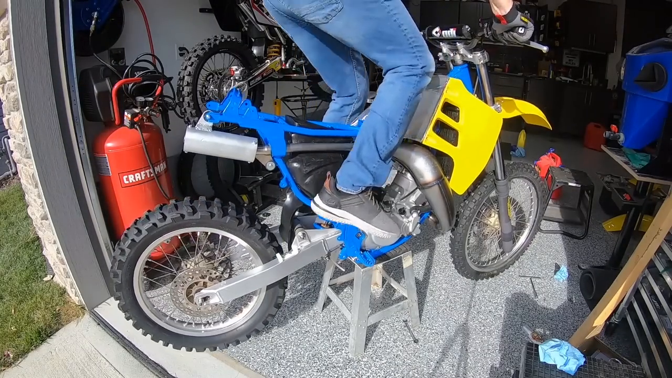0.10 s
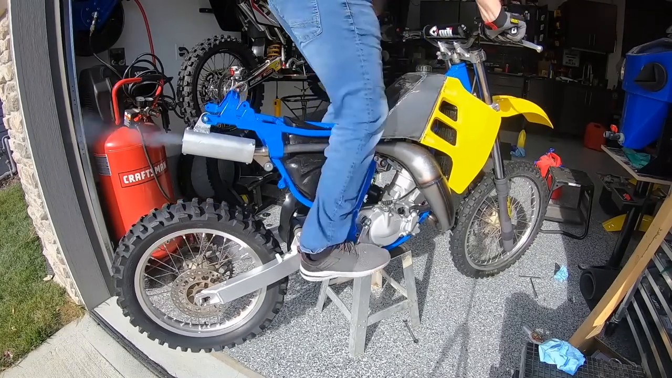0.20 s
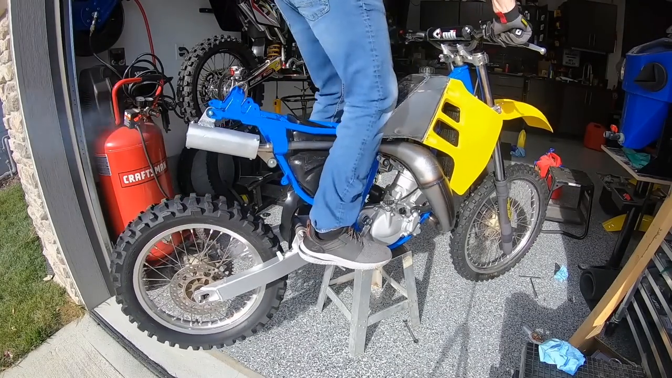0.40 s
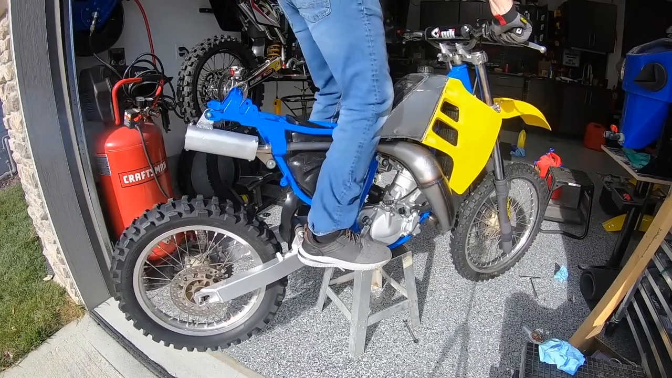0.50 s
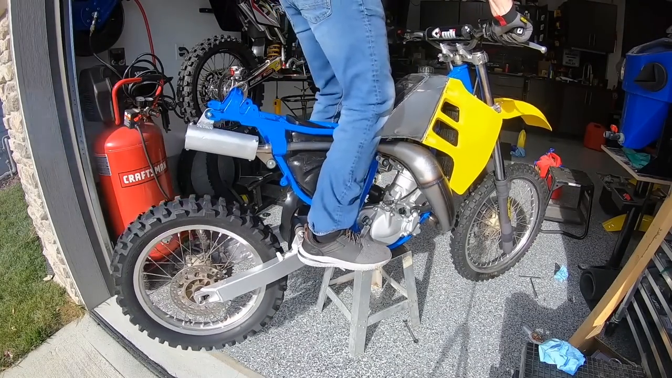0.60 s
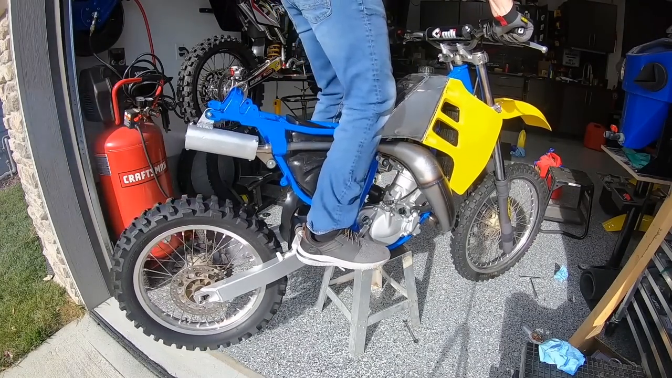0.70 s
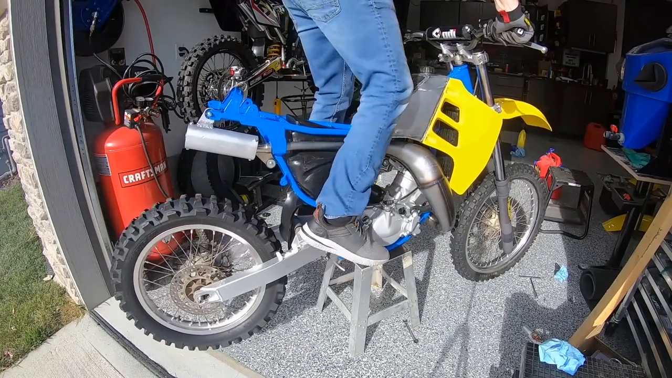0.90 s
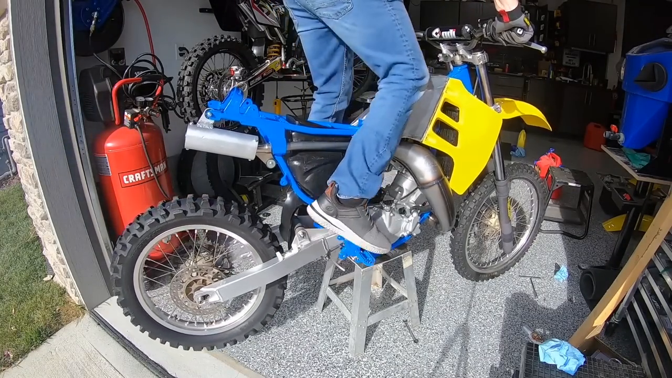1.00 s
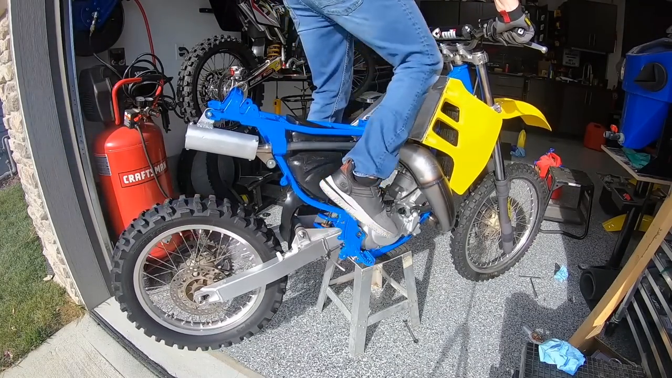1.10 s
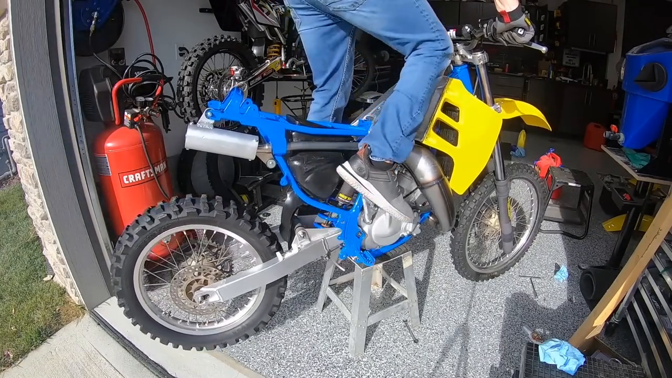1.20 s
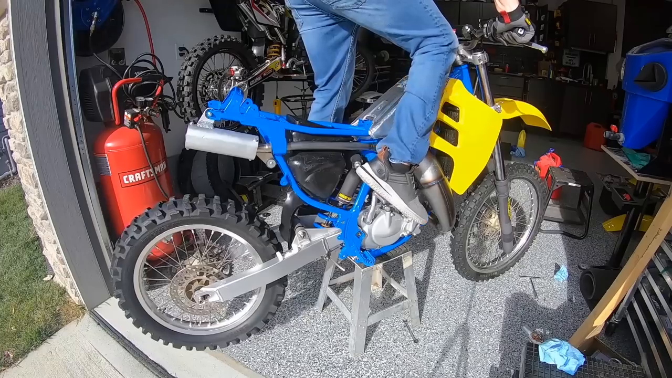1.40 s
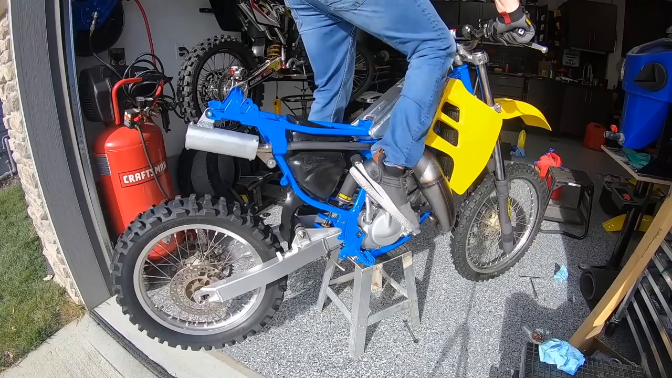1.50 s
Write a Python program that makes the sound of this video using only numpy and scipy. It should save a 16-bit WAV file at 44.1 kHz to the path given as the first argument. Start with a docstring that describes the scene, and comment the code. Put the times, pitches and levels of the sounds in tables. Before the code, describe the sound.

A dirt bike kick-starter is stomped once: ratchety whirr and hollow puffs, engine does not catch.

```python
"""Dirt bike that will not start

A two-stroke dirt bike is kicked over in an open garage and does not catch. Gears whirr as dense random hits,
gas rasps as filtered noise, the exhaust pipe puffs with short sine tones, and ratchet ticks are noise bursts.
Then the kick lever swings back up: noise clacks and ringing steel. Light wind, as noise, touches the microphone."""
import sys
import numpy as np
from scipy import signal
from scipy.fft import rfft, irfft, next_fast_len
from scipy.io import wavfile
from scipy.ndimage import map_coordinates

SR = 44100
rng = np.random.default_rng(int(sys.argv[2]) if len(sys.argv) > 2 else 0)


def transcribe(signal):
    """Save signal, clipped to [-1, 1], as a 16-bit WAV file at the path in sys.argv[1]."""
    frames = np.atleast_2d(signal).T
    limited = np.clip(frames, -1, 1)
    pcm = np.round(limited * 32767).astype(np.int16)
    wavfile.write(sys.argv[1], SR, pcm)


N = 66150  # samples: 1.5 s


def amp(db):
    """Turn decibels into gain."""
    return 10 ** (np.asarray(db) / 20)


def unit(x):
    """Scale a sound to an average (rms) strength of 1."""
    return x / np.sqrt(np.mean(x ** 2) + 1e-20)


def along(points, hz):
    """Read a table of (frequency, value) points, joined up on a logarithmic frequency axis."""
    point_hz, values = np.transpose(points)
    return np.interp(np.log(hz + 1), np.log(point_hz + 1), values)


def level(points):
    """Gain for every sample from (time [s], level [dB]) points."""
    return amp(np.interp(np.arange(N) / SR, *np.transpose(points)))


def since(start_s):
    """Seconds since a start time, zero before it."""
    return np.maximum(np.arange(N) / SR - start_s, 0)


def burst(start_s, attack_s, hold_s, t60_s):
    """Loudness curve: quick rise, short hold, then a fall of 60 dB every t60_s."""
    t = since(start_s)
    rise = 1 - np.exp(-t / attack_s)
    fall = amp(-60 * np.maximum(t - hold_s, 0) / t60_s)  # the hold is counted from the start
    return rise * fall


def filtered(x, response):
    """Reshape the spectrum of x with a function of frequency."""
    size = next_fast_len(N + SR // 2)
    spectrum = rfft(x, size) * response(np.fft.rfftfreq(size, 1 / SR))
    return irfft(spectrum, size)[..., :N]


def resonant(x, resonances):
    """Add resonances, each lifting a narrow band, to x; rows are (Hz, width Hz, lift dB)."""
    def response(f):
        return 1 + sum((amp(lift_db) - 1) * 1j * f * width / (hz * hz - f * f + 1j * f * width)
                       for hz, width, lift_db in resonances)
    return filtered(x, response)


# How wide the stereo sound is: (frequency [Hz], side level over middle level [dB])
STEREO_WIDTH = [(25, -10), (60, -16), (150, -21), (280, -21.5), (500, -12.5), (1000, -4.5), (2000, -5),
                (4000, -7), (7500, -0.5), (12000, 1)]


def spread(pair):
    """Mix two unrelated signals into left and right: nearly mono in the bass, wide in the treble."""
    def middle_and_side(hz):
        angle = np.arctan(amp(along(STEREO_WIDTH, hz)))
        return np.array([np.cos(angle), np.sin(angle)])
    mid, side = filtered(pair, middle_and_side)
    return np.array([mid + side, mid - side])


def noise(colour):
    """Stereo noise of rms 1, coloured by (frequency [Hz], level [dB]) points."""
    coloured = filtered(rng.standard_normal((2, N)), lambda hz: amp(along(colour, hz)))
    return unit(spread(coloured))


def ring(start_s, modes):
    """Struck steel: fading sines, a little out of phase between the two microphones."""
    t = since(start_s)
    out = np.zeros((2, N))
    for hz, db, t60_s in modes:
        strength = amp(db + rng.normal(0, 0.86))  # each strike varies a little
        turns = hz * t + rng.random() + rng.normal(0, 0.041, (2, 1))
        out += strength * burst(start_s, 0.0023, 0, t60_s) * np.sin(2 * np.pi * turns)
    return out


# How long the garage echo lasts: (frequency [Hz], time to fall by 60 dB [s])
GARAGE_DECAY = [(100, 0.57), (260, 0.55), (1000, 0.42), (4000, 0.25), (10000, 0.28)]


def garage(x):
    """The garage's echo: a fading noise tail in which each frequency dies at its own speed."""
    hz, t, cells = signal.stft(rng.standard_normal((2, SR // 2)), SR, nperseg=256)
    fade = amp(-60 * t / along(GARAGE_DECAY, hz)[:, None])
    tail = signal.istft(cells * fade, SR, nperseg=256)[1]
    tail = tail / np.linalg.norm(tail[0])
    tail = np.pad(tail, ((0, 0), (SR // 125, 0)))  # the echo starts 8 ms late
    return spread(signal.fftconvolve(np.atleast_2d(x), tail, axes=1)[:, :N])


# Rise and fall of the wind: (time [s], level [dB])
WIND_LEVEL = [(0, -34.5), (.15, -37.5), (.24, -35), (.45, -39), (.65, -37), (.87, -35.5), (1.0, -40),
              (1.15, -37), (1.5, -34)]
# Spectrum of the wind noise, before it is scaled to rms 1: (frequency [Hz], level [dB])
WIND_COLOUR = [(12, 1), (26, 9), (38, -7), (54, -0.5), (75, -13.5), (110, -13.5), (180, -22), (400, -26),
               (2000, -97)]
# Spectrum of the quiet air, before it is scaled to rms 1: (frequency [Hz], level [dB])
AIR_COLOUR = [(60, -38), (170, -8), (260, 11), (420, -10), (560, -2.5), (1000, -14.5), (2500, -12.5),
              (5000, -23.5), (9000, -28), (11000, -45), (15000, -33)]
AIR_DB = -49


def background():
    """Wind on the microphone, a low noise that swells and sinks, over quiet steady outdoor air."""
    wind = level(WIND_LEVEL) * noise(WIND_COLOUR)
    air = amp(AIR_DB) * noise(AIR_COLOUR)
    return wind + air


# Loudness of the whirring gears: (time [s], level [dB])
WHIRR_LEVEL = [(0, -44), (.10, -48.5), (.15, -41), (.20, -31), (.26, -33.5), (.33, -27), (.40, -27),
               (.49, -28.5), (.60, -30), (.68, -33), (.75, -40.5), (.83, -42.5), (.93, -51), (1.02, -55),
               (1.5, -62)]
# Spectrum of the tooth clatter, before it is scaled to rms 1: (frequency [Hz], level [dB])
WHIRR_COLOUR = [(40, -6.5), (130, 3), (260, 7), (440, 0.5), (540, -5.5), (700, -1.5), (1100, -8),
                (2000, -7), (3600, -7), (4600, -12), (7500, -12.5), (9600, -17.5), (11500, -28.5),
                (14500, -36), (16000, -60)]
# Ringing tones of the crankcase: (frequency [Hz], level against each other [dB])
CASE_MODES = [(524, 3), (1003, 1.5), (1057, 1.5), (1335, 0.5), (1531, -9), (1900, -3), (3047, -4),
              (3704, -18), (4070, -5.5)]
CASE_T60_S, CASE_DB = 0.058, -6  # case level is against the clatter
TEETH_PER_S, TEETH_SPREAD_DB = 3500, 1  # average number of hits, random variation of their level
GRIND_PER_S, GRIND_DB = 200, 1  # how fast and how deep the clatter clumps


def gears():
    """Dense tooth contacts clatter in clumps and ring the crankcase."""
    slow_steps = np.arange(N) * GRIND_PER_S / SR
    clumps = amp(GRIND_DB * map_coordinates(rng.standard_normal(N), [slow_steps]))
    contacts = rng.random(N) < TEETH_PER_S / SR
    strength = amp(TEETH_SPREAD_DB * rng.standard_normal(N))
    hits = clumps * contacts * strength * rng.standard_normal((2, N))
    clatter = unit(spread(filtered(hits, lambda hz: amp(along(WHIRR_COLOUR, hz)))))
    case_ring = ring(0, [(hz, db, CASE_T60_S) for hz, db in CASE_MODES])
    case = signal.fftconvolve(hits, case_ring, axes=1)[:, :N]
    return level(WHIRR_LEVEL) * (clatter + amp(CASE_DB) * unit(spread(case)))


# Spectra of the lower and upper part of a tick, before scaling to rms 1: (frequency [Hz], level [dB])
TICK_BODY = [(300, -29), (1200, -17), (2300, 5), (3600, -0.5), (4400, -6.5), (7000, -17), (12000, -29)]
TICK_TREBLE = [(1000, -33), (4000, -16), (5200, -1), (5900, 0), (7000, 6.5), (7800, 3), (8600, 4),
               (9700, -3.5), (11200, -37), (14500, -35)]
# Resonances of the ratchet: (frequency [Hz], width [Hz], lift [dB])
RATCHET_RESONANCES = [(2310, 180, -1), (3020, 110, 4), (3690, 180, 5), (4960, 150, 4.5), (7000, 260, 1.5),
                      (8650, 89, -7.5)]


def ratchet(contacts, attack_s, hold_s, t60_s):
    """The starter ratchet's teeth slide or skip over each other and excite its resonances."""
    shapes = np.array([burst(start_s, attack_s, hold_s, t60_s) for start_s, _, _ in contacts])
    body, treble = amp(np.array(contacts)[:, 1:]).T @ shapes
    friction = body * noise(TICK_BODY) + treble * noise(TICK_TREBLE)
    return amp(-2) * resonant(friction, RATCHET_RESONANCES)


# Soft scrapes, levels before the ratchet's 2 dB cut and resonances:
# (time [s], body level [dB], treble level [dB])
SCRAPES = [(0, -44.5, -37.5), (.045, -42.5, -43.5), (.113, -40.5, -42), (.170, -42, -64)]


def scrapes():
    """The boot loads the lever and the ratchet teeth scrape softly, with a slow fade."""
    return ratchet(SCRAPES, attack_s=0.00097, hold_s=0.0072, t60_s=0.22)


# Gusts of gas, levels before the resonances:
# (time [s], level [dB], hold [s], resonance [Hz])
GUSTS = [(0.203, -20, 0.0055, 526), (0.219, -25.5, 0.029, 760), (0.28, -17, 0.0055, 640),
         (0.354, -20, 0.018, 1955), (0.441, -30, 0.0042, 2540), (0.449, -19.5, 0.014, 1536),
         (0.599, -29, 0.0052, 1360), (0.766, -34, 0.02, 1040)]
# Spectrum of the gas noise, before it is scaled to rms 1: (frequency [Hz], level [dB])
GAS_COLOUR = [(60, 2), (150, 7), (330, 8.5), (450, -5), (530, 2), (900, -3), (1600, -1.5), (1950, -3),
              (2150, -12.5), (3700, -10), (5000, -29), (9500, -22.5), (11500, -34), (15000, -43)]
# Resonance of the expansion chamber: (frequency [Hz], width [Hz], lift [dB])
CHAMBER = [(519.8, 12, 13.5)]
GUST_ATTACK_S, GUST_T60_S = 0.0025, 0.071
GUST_WIDTH_HZ, GUST_LIFT_DB = 52, 8.5


def ports():
    """Compressed gas rasps out of the cylinder, each gust with its own throat, and rings the chamber."""
    gas = noise(GAS_COLOUR)
    gusts = np.zeros((2, N))
    for start_s, db, hold_s, hz in GUSTS:
        gust = amp(db) * burst(start_s, GUST_ATTACK_S, hold_s, GUST_T60_S) * gas
        gusts += resonant(gust, [(hz, GUST_WIDTH_HZ, GUST_LIFT_DB)])
    return resonant(gusts, CHAMBER)


# Puffs in the exhaust pipe, levels before the pipe tones' own:
# (time [s], level [dB], hold [s], pitch [Hz])
PUFFS = [(0.205, -7.5, 0.021, 242.6), (0.238, -7, 0.0046, 262), (0.248, -2.5, 0.011, 251.7),
         (0.265, -11, 0.0078, 223), (0.287, -2, 0.0097, 227), (0.307, -15, 0.0074, 222),
         (0.324, -3, 0.008, 252.5), (0.348, -18, 0.01, 209), (0.361, -4, 0.0079, 245),
         (.382, -13, 0.017, 269), (0.429, -18, 0.0079, 257), (0.452, -11, 0.006, 227),
         (.620, -23, 0.012, 216), (.674, -18, 0.017, 253), (0.775, -15, 0.014, 237),
         (0.802, -25, 0.0092, 268), (0.834, -37, 0.0072, 265)]
# Tones of the pipe: (multiple of the pitch, level [dB])
PIPE_TONES = [(1, -1.5), (1.52, -15), (.66, -18.5)]
PUFF_ATTACK_S, PUFF_T60_S, PUFF_ECHO_DB = 0.0022, 0.026, -12.5


def exhaust():
    """The piston pumps hollow puffs, each booming for a few cycles in the pipe."""
    out = np.zeros((2, N))
    for start_s, db, hold_s, hz in PUFFS:
        tone = np.zeros(N)
        for i, (multiple, tone_db) in enumerate(PIPE_TONES):
            phase = (i > 0) * rng.random()  # the main tone always starts at zero
            tone += amp(tone_db) * np.sin(2 * np.pi * (multiple * hz * since(start_s) + phase))
        puff = amp(db) * burst(start_s, PUFF_ATTACK_S, hold_s, PUFF_T60_S) * tone
        out += puff + amp(PUFF_ECHO_DB) * garage(puff)
    return out


# Ratchet ticks, levels before the ratchet's 2 dB cut and resonances:
# (time [s], body level [dB], treble level [dB])
TICKS = [(.222, -27, -56), (.243, -25, -41), (0.28, -22.5, -27), (.320, -54, -31.5), (.354, -23, -33),
         (0.379, -37, -31.5), (.395, -29, -31), (.409, -29.5, -36), (0.426, -36, -33), (.444, -23, -38),
         (.458, -58, -27.5), (.476, -41, -32), (.506, -30, -30.5), (.526, -28, -37), (.543, -27.5, -32.5),
         (.565, -27.5, -39), (0.585, -34, -29.5), (0.609, -25.5, -32), (.633, -30.5, -30.5),
         (0.663, -37.5, -30.5), (0.694, -26, -32), (.735, -39, -34.5), (.752, -37, -37), (.771, -35, -44),
         (0.79, -45, -37.5), (.811, -46, -46), (.837, -43.5, -40), (.860, -42, -38.5), (.887, -42, -40.5),
         (.923, -43, -38.5), (.959, -42, -39)]


def ticks():
    """The starter ratchet rattles, its sharp ticks slowing towards the end."""
    return ratchet(TICKS, attack_s=0.00059, hold_s=0.0042, t60_s=0.054)


# Short tinks: (time [s], pitch [Hz], level [dB])
TINKS = [(0.228, 10520, -36.5), (.890, 2920, -41.5), (1.015, 2270, -44)]
TINK_WIDTH_HZ, TINK_ATTACK_S, TINK_HOLD_S, TINK_T60_S = 430, 0.0011, 0.0089, 0.039


def tinks():
    """Loose steel parts buzz briefly, each in one narrow resonance."""
    out = np.zeros((2, N))
    for start_s, hz, db in TINKS:
        hiss = rng.standard_normal((2, N))
        buzz = filtered(hiss, lambda f: 1 / (1 + (2 * (f - hz) / TINK_WIDTH_HZ) ** 2))
        shape = burst(start_s, TINK_ATTACK_S, TINK_HOLD_S, TINK_T60_S)
        out += amp(db) * shape * unit(spread(buzz))
    return out


# Clacks of the returning lever, noise levels before the resonances, ring level added to each tone's own:
# (time [s], level [dB], treble level [dB], ring level [dB], lower resonance [Hz], upper resonance [Hz])
CLACKS = [(1.058, -32.5, -40, -41, 3240, 4100), (1.145, -33.5, -37.5, -31.5, 2220, 4770),
          (1.231, -31.5, -39, -33, 1840, 4400), (1.327, -31.5, -36, -46, 1900, 7800)]
# Spectra of the clacks and of the last click, before scaling to rms 1: (frequency [Hz], level [dB])
CLACK_COLOUR = [(200, 0), (500, -8.5), (800, 3.5), (1300, -0.5), (2100, -2), (2900, 1.5), (4000, -0.5),
                (5500, -3.5), (8000, -8.5), (9700, -4), (11500, -32), (15000, -27)]
STOP_COLOUR = [(500, -32), (1700, -14), (2400, 0), (3050, -4), (3400, -6), (5200, -16), (5900, -1),
               (6600, 0), (8200, -5.5), (9600, -23), (15000, -44)]
CLACK_ATTACK_S, CLACK_HOLD_S, CLACK_T60_S = 0.0014, 0.0044, 0.068
CONTACT_WIDTHS_HZ, CONTACT_LIFT_DB = (240, 170), 6.5  # widths of the lower and upper resonance
STOP_S, STOP_DB, STOP_T60_S = 1.457, -36.5, 0.03  # the last, lighter click


def lever():
    """The lever rises over the teeth, each clack with its own colour, and comes to its stop."""
    body, treble = noise(CLACK_COLOUR), noise(TICK_TREBLE)
    stop_shape = burst(STOP_S, CLACK_ATTACK_S, CLACK_HOLD_S, STOP_T60_S)
    out = amp(STOP_DB) * stop_shape * noise(STOP_COLOUR)
    for start_s, db, treble_db, _, *contact_hz in CLACKS:
        shape = burst(start_s, CLACK_ATTACK_S, CLACK_HOLD_S, CLACK_T60_S)
        crack = shape * (amp(db) * body + amp(treble_db) * treble)
        resonances = [(hz, width, CONTACT_LIFT_DB) for hz, width in zip(contact_hz, CONTACT_WIDTHS_HZ)]
        out += resonant(crack, resonances)
    return out


# Ringing tones of the lever, levels before the clack's ring level and a small random change:
# (frequency [Hz], level [dB], time to fall by 60 dB [s])
LEVER_MODES = [(1012, -13, 0.1), (1350, -17, 0.15), (2010, -19, 1), (2020, 5, 0.034), (3620, -13, 0.044),
               (3710, 5, 0.08), (3750, -12, 0.042), (7790, -11, 0.053), (9340, -32, 0.033)]
LEVER_ECHO_DB = -18


def lever_steel():
    """Each clack rings the steel lever, heard with only a little echo."""
    steel = sum(amp(ring_db) * ring(start_s, LEVER_MODES) for start_s, _, _, ring_db, *_ in CLACKS)
    return steel + amp(LEVER_ECHO_DB) * garage(steel)


SPRING_S, SPRING_HZ, SPRING_DB, SPRING_T60_S = 1.27, 1303, -53, 3.0


def spring():
    """A thin sine ring lingers as the lever comes up, probably its return spring."""
    tone = np.sin(2 * np.pi * SPRING_HZ * since(SPRING_S))
    return amp(SPRING_DB) * burst(SPRING_S, 0.03, 0, SPRING_T60_S) * tone


METAL_ECHO_DB = -9.5


def scene():
    """The failed kick start in the garage: gas noise and metal share one echo."""
    metal = gears() + scrapes() + ports() + ticks() + tinks() + lever()
    metal_in_garage = metal + amp(METAL_ECHO_DB) * garage(metal)
    return background() + metal_in_garage + exhaust() + lever_steel() + spring()


# Balance between the two sides: (frequency [Hz], left over right [dB])
BALANCE = [(200, 0), (500, 0.7), (1000, -2), (2000, -1), (4000, -1.3), (8000, -0.5), (12000, 1.5)]
TOP_HZ = 15700


def record(dry):
    """Shift the left-right balance by frequency, mostly a little to the right, and cut off the top."""
    def response(hz):
        sides = np.array([[0.5], [-0.5]])  # half the difference on each side
        return amp(along(BALANCE, hz) * sides) * (hz < TOP_HZ)
    return filtered(dry, response)


dry = scene()
out = record(dry)
transcribe(out)
```